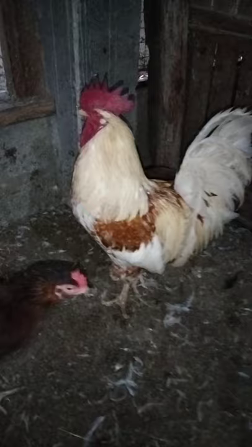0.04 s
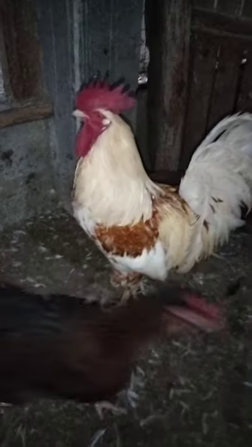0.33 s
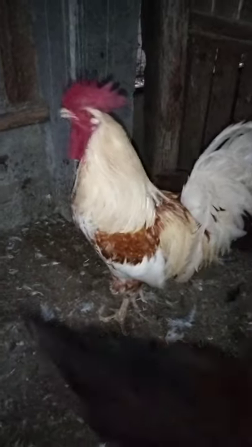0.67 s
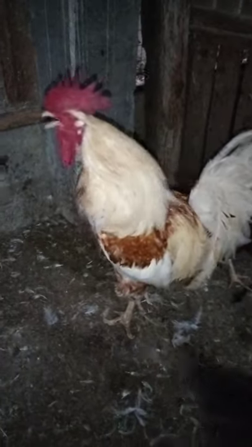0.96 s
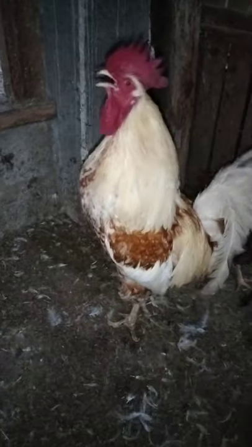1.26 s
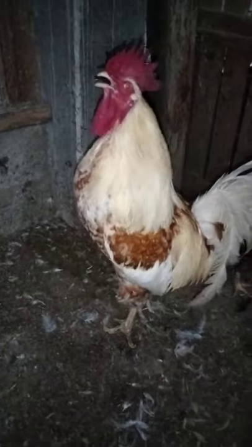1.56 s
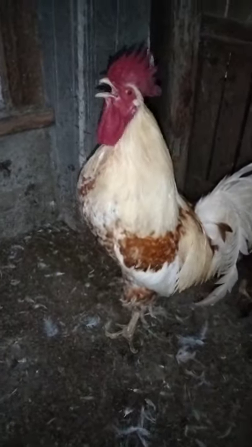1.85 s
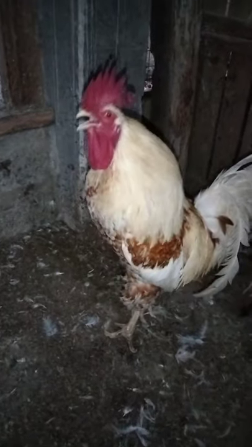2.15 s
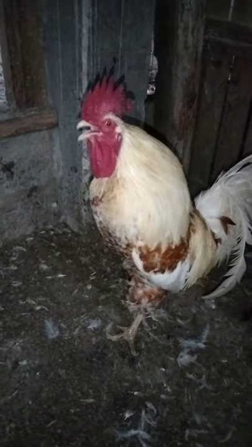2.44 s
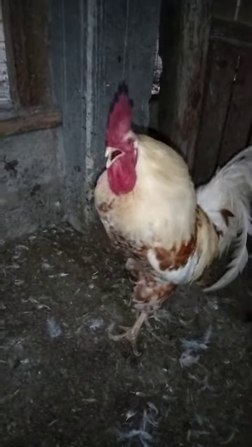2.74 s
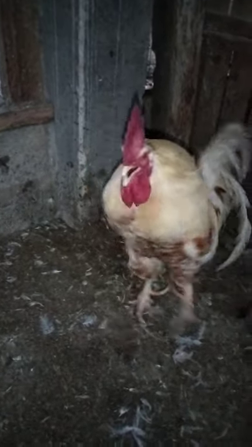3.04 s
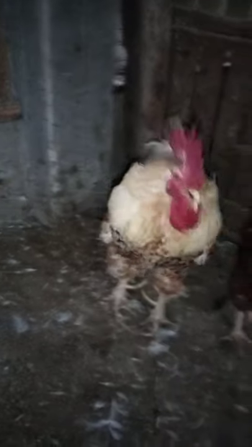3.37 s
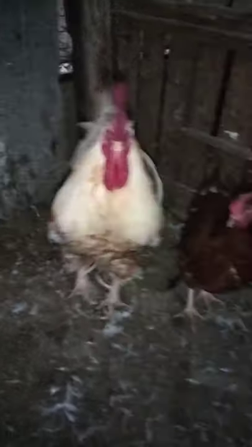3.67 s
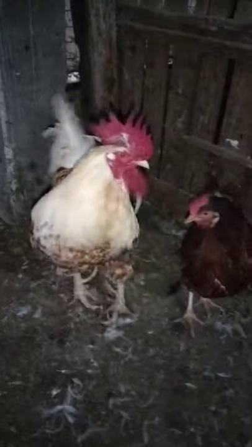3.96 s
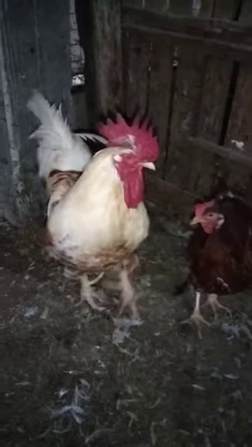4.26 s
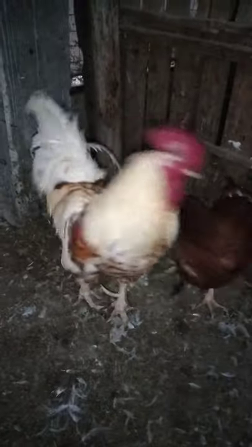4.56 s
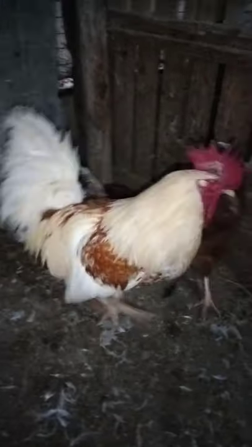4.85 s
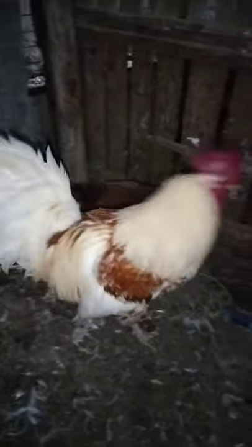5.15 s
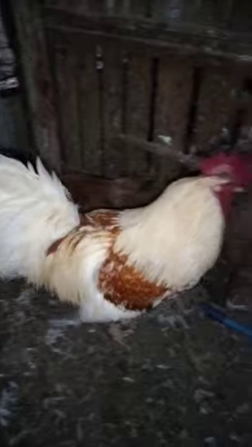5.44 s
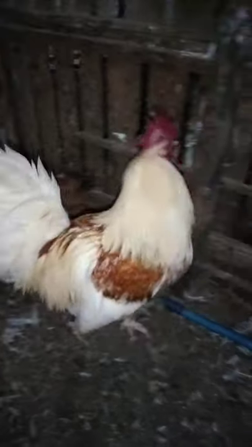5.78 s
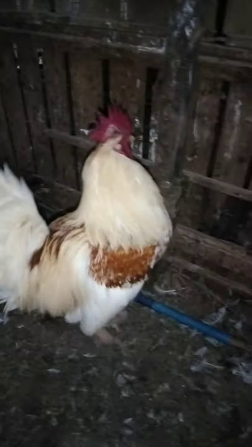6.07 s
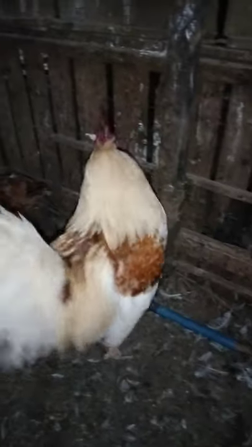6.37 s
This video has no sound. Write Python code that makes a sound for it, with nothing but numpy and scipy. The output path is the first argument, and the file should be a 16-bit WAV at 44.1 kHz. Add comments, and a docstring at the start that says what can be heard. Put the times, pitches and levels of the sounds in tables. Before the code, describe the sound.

A rooster crows once, loud and rasping, in a small wooden coop, with faint scuffing in litter and soft clucks.

```python
"""A small wooden coop, a rooster about a metre away. He crows once: a short note, a long rasping one,
then a sudden break to a lower, brassier register that sinks to the end. Clapping membranes make
the tone; throat and beak colour it. Before and after, the birds cluck softly, scuff through dry
litter, bump the boards and tread the earth floor, over a faint rumble and a hush from outside."""
import sys
import numpy as np
from scipy import signal
from scipy.fft import rfft, irfft
from scipy.io import wavfile
from scipy.ndimage import uniform_filter1d

SR = 44100
rng = np.random.default_rng(int(sys.argv[2]) if len(sys.argv) > 2 else 0)


def generate_wav(sig):
    """Save sig (samples, or channels by samples) to the path in sys.argv[1] as 16-bit PCM at SR."""
    pcm = np.round(np.clip(np.atleast_2d(sig).T, -1, 1) * 32767).astype(np.int16)
    wavfile.write(sys.argv[1], SR, pcm)


N = 282681
T = np.arange(N) / SR


def undb(db):
    """Decibels to gain."""
    return 10 ** (np.asarray(db) / 20)


def unit(x):
    """Scale to rms 1."""
    return x / np.sqrt(np.mean(x ** 2))


def curves(rows):
    """Breakpoints to automation: one curve for each column after the time."""
    times, *columns = np.transpose(rows)
    return [np.interp(T, times, column) for column in columns]


def band(x, lo_hz, hi_hz, order=2):
    """Butterworth band-pass."""
    sos = signal.butter(order, [lo_hz, min(hi_hz, SR / 2 - 1)], "band", fs=SR, output="sos")
    return signal.sosfilt(sos, x + 1e-18)


def colour(x, points, peaks=(), size=4096):
    """Minimum-phase EQ through points (f/Hz, gain/dB), plus peaks (f/Hz, half-width/Hz, gain/dB)."""
    hz, db = np.transpose(points)
    f = np.maximum(np.fft.rfftfreq(size, 1 / SR), 1)
    peaks_db = sum(gain / (1 + ((f - centre) / width) ** 2) for centre, width, gain in peaks)
    shape_db = np.interp(np.log(f), np.log(hz), db) + peaks_db
    cepstrum = irfft(np.log(undb(shape_db)))
    cepstrum[1:size // 2] *= 2
    cepstrum[size // 2 + 1:] = 0
    return signal.fftconvolve(x, irfft(np.exp(rfft(cepstrum))))[:len(x)]


def wander(hz):
    """Random motion slower than hz, rms 1."""
    return unit(signal.sosfilt(signal.butter(2, hz, fs=SR, output="sos"), rng.standard_normal(N)))


def fade(t, t60):
    """Exponential decay, 60 dB down after t60 seconds."""
    return np.exp(-np.log(1000) * t / max(t60, 1e-3))


def add(out, s, x):
    """Mix x into out at s seconds."""
    i = max(int(s * SR), 0)
    out[i:i + len(x)] += x[:N - i]


# EQ of the rumble and of the hush: f/Hz, gain/dB
RUMBLE_EQ = [(30, -46), (55, -22), (90, 0.5), (135, -2.5), (220, -11.5), (400, -33), (1500, -53.5)]
HUSH_EQ = [(60, -35), (280, -2.5), (600, -10), (850, 0), (1080, -12.5), (1400, 2.5), (1750, -10.5),
           (2200, -34.5), (4000, -26), (6400, -36), (7500, -25.5), (9000, -40.5), (15000, -36)]
# Fader ride on the hush, ahead of the dip: t/s, level/dB
HUSH_RIDE = [(0, -62), (1.15, -63), (3.7, -60), (4.6, -67), (5.5, -68), (5.7, -58.5), (6.4, -65)]


def background(rumble_db=-67, flicker_db=1.1, dip_s=2.3, dip_width_s=.7, dip_db=-14):
    """A wavering bed of rumble and murky hush from outside; it dips under the crow and comes back."""
    dip = dip_db * np.exp(-((T - dip_s) / dip_width_s) ** 2)
    hush_db, = curves(HUSH_RIDE)
    out = np.zeros(N)
    for eq, db in ((RUMBLE_EQ, rumble_db), (HUSH_EQ, hush_db)):
        bed = unit(colour(rng.standard_normal(N), eq))
        out += bed * undb(db + dip + flicker_db * wander(3.2))
    return out


# Soft calls of the flock:
# t/s, length/s, start pitch/Hz, end pitch/Hz, relative level/dB, roll-off/(dB/octave), beak peak/dB
CLUCK_CUES = [(0.323, 0.014, 305, 293, -52, 42, 8), (5.602, 0.078, 588, 728, -52, -2, 1),
              (5.668, 0.17, 803, 908, -56.5, -1, 26.5), (5.763, 0.046, 471, 460, -55, 7.5, 5.5),
              (5.93, 0.046, 287, 261, -48.5, 22, -8), (6.167, 0.047, 229.3, 263, -47, 4.5, -2),
              (6.208, 0.022, 280, 238, -49, 15, 3.5), (6.233, 0.041, 284, 324, -45.5, 15, 4),
              (6.239, 0.19, 685, 617, -57, 0.5, 6), (6.304, 0.043, 235, 291, -42.5, 2.5, -23),
              (6.34, 0.01, 284, 264, -52, 10, 2)]


def clucks(beak_hz=1380, beak_width_hz=280, top_hz=1700, jitter=0.024, husk=0.2, gain_db=1):
    """Quiet, husky calls through a nearly closed beak: a few harmonics that swell and stop quickly."""
    out, waver = np.zeros(N), wander(126)
    air = unit(band(rng.standard_normal(N), 460, 1530, order=4))
    k = np.arange(1, 13)[:, None]  # harmonic numbers
    for s, length, start_hz, end_hz, db, fall_db, beak_db in CLUCK_CUES:
        progress = np.linspace(0, 1, int(length * SR))
        now = (int(s * SR) + np.arange(len(progress))) % N
        hz = (start_hz + (end_hz - start_hz) * progress) * (1 + jitter * waver[now])
        phase = 2 * np.pi * np.cumsum(hz) / SR
        peak_db = beak_db * np.exp(-((k * hz - beak_hz) / beak_width_hz) ** 2)
        gain = undb(peak_db - fall_db * np.log2(k)) / (1 + (k * hz / top_hz) ** 8)
        call = unit(np.sum(gain * np.cos(k * phase), axis=0)) + husk * air[now]
        add(out, s, undb(db + gain_db) * unit(call * np.sin(np.pi * progress ** 0.92)))
    return out


# EQ of dry litter: f/Hz, gain/dB
LITTER_EQ = [(100, -14.5), (300, 7), (700, -1), (1400, 6.5), (2200, -6.5), (4000, -10), (6000, -17.5),
             (9000, -24), (15000, -47.5)]
# Feet and feathers in the litter: t/s, relative level/dB, treble tilt/(dB/octave), swell/s, t60/s
SCUFF_CUES = [(0.324, -52, -4.5, 0.0058, 0.9), (0.399, -52, 4, 0.027, 0.24), (0.621, -57.5, 0.5, 0.003, 1),
              (0.799, -57, -10, 0.012, 0.94), (0.826, -42, 5, 0.0032, 0.0054),
              (1.054, -50, -1, 0.0064, 0.37), (1.165, -47, -20, .008, 0.22),
              (3.742, -50.5, -15, 0.0068, 0.29), (4.125, -52, -7, 0.019, 0.67),
              (4.347, -55.5, 3, 0.014, 0.36), (4.587, -65, 7, 0.014, 0.31),
              (4.809, -41.5, -0.5, 0.006, 0.33), (5.146, -44.5, -1.5, 0.014, 0.25),
              (5.286, -54, 3, 0.014, 0.29), (5.572, -47, -2, 0.014, 0.78),
              (5.877, -43.5, -19, 0.0078, 0.26), (5.933, -45.5, -2, 0.0074, 0.39),
              (6.03, -56.5, 1.5, .015, 0.7), (6.367, -41, -2, 0.011, 0.43)]


def scuffs(grain_db=3, catch_db=2, pivot_hz=1600, straw_db=-32, straw_spread_db=11):
    """A foot or wing catches and slips through litter: a swell of tiny cracks and snapping stalks."""
    out, t, catching = np.zeros(N), T[:SR // 2], wander(70)
    for s, db, tilt_db, swell_s, t60 in SCUFF_CUES:
        noise, sizes = rng.standard_normal((2, len(t)))
        eq = [(hz, gain + tilt_db * max(np.log2(hz / pivot_hz), 0)) for hz, gain in LITTER_EQ]
        grains = noise * undb(grain_db * np.repeat(sizes, 30)[:len(t)])
        drag = undb(catch_db * np.roll(catching, -int(s * SR))[:len(t)])
        cracks = unit(colour(grains, eq) * drag)
        snaps = noise * undb(straw_spread_db * np.repeat(sizes, 90)[:len(t)])
        straw = undb(straw_db + 2 * tilt_db) * unit(band(snaps, 9000, 15500))  # less in dull scuffs
        envelope = np.minimum(t / swell_s, 1) * fade(np.maximum(t - swell_s, 0), t60)
        add(out, s, undb(db) * (cracks + straw) * envelope)
    return out


# Modes of the boards: f/Hz, half-width/Hz, gain/dB
BOARD_MODES = [(593, 560, 0), (844, 16, 6), (1100, 19, -23), (1400, 48, -25), (1840, 140, -22)]
# Bumps on the boards: t/s, relative level/dB, low body trim/dB
KNOCK_CUES = [(0.763, -36, -16), (3.681, -50.5, 7), (3.796, -39, -10), (4.897, -39, -31.5),
              (5.934, -41.5, -14)]


def knocks(rise_s=0.0017, contact_s=0.0042, t60=0.18, gain_db=-3.5, body_db=-3):
    """A soft, rattling bump rings the damped boards."""
    out, t = np.zeros(N), T[:SR // 3]
    envelope = np.minimum(t / rise_s, 1) * fade(np.maximum(t - contact_s, 0), t60)
    for s, db, trim_db in KNOCK_CUES:
        push = rng.standard_normal(len(t))
        modes = sum(undb(gain) * band(push, max(hz - width, 50), hz + width, order=1)
                    for hz, width, gain in BOARD_MODES)
        wood = unit(band(modes, 410, 1560, order=4))
        body = undb(body_db + trim_db) * unit(band(push, 220, 460))
        add(out, s, undb(db + gain_db) * (wood + body) * envelope)
    return out


# Dull footfalls: t/s, level/dB
THUD_CUES = [(.868, -47), (5.429, -60.5)]


def thuds(hz=112, rise_s=0.0035, t60=0.27):
    """A footfall gives the earth floor a short low bump."""
    out, t = np.zeros(N), T[:SR // 3]
    envelope = np.minimum(t / rise_s, 1) * fade(t, t60)
    for s, db in THUD_CUES:
        earth = 0.607 * unit(band(rng.standard_normal(len(t)), 90, 450))
        add(out, s, undb(db) * (np.sin(2 * np.pi * hz * t) + earth) * envelope)
    return out


# Hoarse bursts in the crow: t/s, length/s, rasp/0-1, period doubling/0-1, pitch shift/Hz
HOARSE_BURSTS = [(1.178, 0.025, .65, 0.53, 0), (1.214, 0.13, 0.54, 0, 0), (1.396, 0.047, 0.37, 0.18, 0),
                 (1.447, .105, .12, 0, -0.5), (1.55, .035, .55, 0.37, 0.5), (1.584, .078, .09, 0.01, -0.5),
                 (1.663, 0.09, .44, 0.42, 34.5), (1.979, 0.077, .09, 0.05, 1),
                 (2.058, .065, 0.66, .35, -24.5), (2.378, 0.022, .1, 0.02, -1),
                 (2.951, 0.2, 0.06, 0.03, -0.5), (3.518, 0.036, 0.13, 0.24, 1)]


def hoarseness(high_register, edge_s=0.026, high_rasp=0.028, low_rasp=0.017):
    """The voice breaks up at the attacks and when overdriven; a trace of rasp stays in between."""
    rasp, doubling, shift_hz = sum(
        np.outer(amounts, np.clip(.5 + np.minimum(T - s, s + length - T) / edge_s, 0, 1))
        for s, length, *amounts in HOARSE_BURSTS)
    rasp += np.where(high_register, high_rasp, low_rasp)
    return np.clip(rasp, 0, 1), np.clip(doubling, 0, 1), shift_hz


# Pitch line of the short note, then the long note's rise, hold and low register: t/s, f/Hz
SHORT_LINE = [(1.185, 554), (1.221, 649), (1.253, 695), (1.283, 663), (1.335, 643.5)]
RISE_LINE = [(1.41, 563), (1.425, 621.5), (1.442, 777), (1.49, 859.4), (1.52, 851), (1.546, 768.7),
             (1.58, 802), (1.655, 838), (1.756, 806.7)]
HOLD_LINE = [(1.775, 801), (1.891, 783.8), (2.051, 793.6), (2.073, 770.4), (2.083, 744.6), (2.115, 744.3),
             (2.133, 788.2), (2.375, 775.3)]
LOW_LINE = [(2.39, 704.3), (2.504, 710.1), (2.6, 705), (2.764, 700.6), (3.072, 669), (3.186, 646.3),
            (3.302, 630.1), (3.5, 597)]


def syrinx(jitter=0.031, lurch=.03, flutter=0.00085, shimmer=0.079, breath=0.08, quadrupling=0.14,
           shudder_hz=33, shudder_depth=0.013, settled_s=2, settling_s=.25,
           choke_s=3.506, choke_hz_per_s=3900, lowest_hz=430):
    """Membranes clap shut once a cycle; driven hard they beat unevenly, in twos and fours."""
    hz, = curves(np.vstack([SHORT_LINE, RISE_LINE, HOLD_LINE, LOW_LINE]))
    high_register = T < LOW_LINE[0][0]
    rasp, doubling, shift_hz = hoarseness(high_register)
    collapse_hz = choke_hz_per_s * np.maximum(T - choke_s, 0)  # the air runs out
    hz = np.maximum(hz + shift_hz - collapse_hz, lowest_hz)
    unsettled = np.clip((settled_s - T) / settling_s, 0, 1)
    shudder = shudder_depth * unsettled * np.sin(2 * np.pi * shudder_hz * T + wander(4.1))
    roughness = rasp * (jitter * wander(280) + lurch * wander(130))
    wobble = np.where(high_register, .0025, .0023) * wander(14)
    hz *= 1 + shudder + roughness + wobble + flutter * wander(70)
    phase = 2 * np.pi * np.cumsum(hz) / SR
    claps = unit(sum(np.cos(k * phase) * np.clip((18000 - k * hz) / 2000, 0, 1) for k in range(1, 30)))
    uneven = doubling * np.cos(phase / 2) + quadrupling * rasp * np.cos(phase / 4)
    force = 1 + uneven + shimmer * rasp * wander(190)
    air = breath * (rasp + 0.067) * (1 + np.cos(phase)) * rng.standard_normal(N)
    return claps * force + air


# EQ of throat and open beak, high and low register: f/Hz, gain/dB
HIGH_THROAT_EQ = [(250, -39.5), (450, -25.5), (750, -12), (1000, -24), (1300, -6), (1620, 0.5),
                  (1960, -29.5), (2220, -22), (2450, -25.5), (3200, -23), (4700, -49), (5900, -33),
                  (7100, -34.5), (9500, -56.5), (15000, -60)]
LOW_THROAT_EQ = [(280, -21), (500, -1), (1050, -25), (1470, -6), (2050, -33), (2830, -19.5), (3600, -38.5),
                 (4250, -38), (4850, -29.5), (5600, -40), (6250, -27.5), (6900, -44), (8000, -39),
                 (10500, -56.5), (15000, -52.5)]
# Narrow peaks and a notch of windpipe and beak that overtones slide through: f/Hz, half-width/Hz, gain/dB
HIGH_RESONANCES = [(2174, 110, 14), (3080, 66, 7), (3963, 100, 7), (4440, 180, -4.5), (7390, 160, 6)]
LOW_RESONANCES = [(2880, 110, 6.5), (5187, 140, 12), (6064, 110, 9.9), (6337, 52, 9.2), (8150, 100, 11),
                  (12080, 270, 3.8), (13590, 300, 5)]
# Fundamental, main, middle and top bands, levelled only on average so single overtones can flare:
# low edge/Hz, high edge/Hz, averaging time/s
VOICE_BANDS = [(200, 980, .02), (980, 1850, .02), (1850, 4350, .04), (4350, 16000, .12)]
# Fader rides for the short note, the long note and its low register:
# t/s, main band level/dB, then relative to it fundamental/dB, middle/dB, top/dB
SHORT_RIDE = [(1.19, -17.5, -6, -16.5, -26), (1.228, -19.5, 3.5, -18, -14.5), (1.254, -10, -27.5, -36, -30),
              (1.318, -19.5, -7.5, -37.5, -19), (1.335, -31, -6, -18.5, -20)]
LONG_RIDE = [(1.415, -24.5, -7.5, -14.5, -37.5), (1.427, -21, 2.5, -5, -16.5),
             (1.435, -13.5, -13, -16.5, -37.5), (1.503, -15, -4, -24.5, -27),
             (1.547, -14, -9.5, -15.5, -31), (1.731, -19.5, -3, -10, -17), (1.755, -14, -9, -19, -24.5),
             (2.007, -12.5, -12, -25.5, -28.5), (2.135, -14.5, -15, -16.5, -29.5),
             (2.149, -12.5, -15, -33, -26.5), (2.251, -9, -21.5, -46.5, -40.5),
             (2.367, -12.5, -18.5, -44.5, -33), (2.378, -14, -14, -38, -35)]
LOW_RIDE = [(2.39, -15, -17.5, -20.5, -20.5), (2.45, -14.5, -20, -16, -21), (2.66, -15.5, -16, -20, -17),
            (2.702, -16, -14, -24.5, -24), (2.772, -14.5, -16.5, -23.5, -21.5),
            (2.946, -27, -3, -15.5, -10), (3.142, -23, -16, -19, -15.5), (3.164, -23, -9, -20, -11.5),
            (3.218, -29, 1, -17, -3.5), (3.472, -28.5, 3.5, -19, -2), (3.52, -27.5, 12.5, -8.5, -8.5),
            (3.535, -19, -10, -26, -34)]


def crow(attack_s=0.0048, release_s=0.016):
    """The throat shapes each note; its level and balance, fundamental to brassy top, shift as it goes."""
    source, out = syrinx(), np.zeros(N)
    high = near_boards(colour(source, HIGH_THROAT_EQ, HIGH_RESONANCES))
    low = near_boards(colour(source, LOW_THROAT_EQ, LOW_RESONANCES))
    for ride, voice in ((SHORT_RIDE, high), (LONG_RIDE, high), (LOW_RIDE, low)):
        db, fundamental_db, middle_db, top_db = curves(ride)
        attack = np.clip(1 + (T - ride[0][0]) / attack_s, 0, 1)
        release = np.clip(1 - (T - ride[-1][0]) / release_s, 0, 1)
        for (lo, hi, span_s), trim_db in zip(VOICE_BANDS, (fundamental_db, 0, middle_db, top_db)):
            part = band(voice, lo, hi, order=5)
            rms = np.sqrt(np.abs(uniform_filter1d(part ** 2, size=int(span_s * SR))) + 1e-12)
            out += part * uniform_filter1d(attack * release * undb(db + trim_db) / rms, size=200)
    return out


def near_boards(x, share=0.73, t60=0.034):
    """Early reflections off floor and walls make each overtone swell and sink as the pitch slides."""
    t = T[:SR // 10]
    echoes = rng.standard_normal(len(t)) * fade(t, t60) * (t > .002)
    return x + share * signal.fftconvolve(x, echoes / np.linalg.norm(echoes))[:N]


def coop(x, wet_db=-13, low_t60=0.26, high_t60=0.27, build_s=0.012):
    """The short, diffuse ring of the wooden room."""
    t = T[:SR // 2]
    noise = rng.standard_normal(len(t))
    tail = band(noise, 67, 3800) * fade(t, low_t60) + band(noise, 3400, 21000) * fade(t, high_t60)
    tail *= np.minimum(t / build_s, 1)
    return x + undb(wet_db) * signal.fftconvolve(x, tail / np.linalg.norm(tail))[:N]


def scene():
    """Mono mix: all the birds share one room, over the background bed."""
    steps = undb(-3) * near_boards(scuffs(), share=0.65, t60=.14)
    birds = crow() + steps + knocks() + thuds() + clucks()
    return (coop(birds) + background())[None]


def record(dry, start_s=.085, top_hz=15550):
    """Master: an instant of silence at the head and a steep high cut."""
    high_cut = signal.ellip(10, .2, 80, top_hz, fs=SR, output="sos")
    return signal.sosfilt(high_cut, dry * (T > start_s))


dry = scene()
out = record(dry)
generate_wav(out)
```